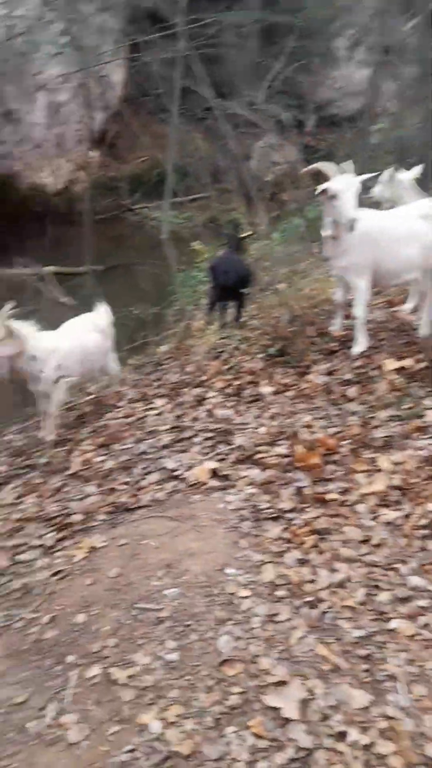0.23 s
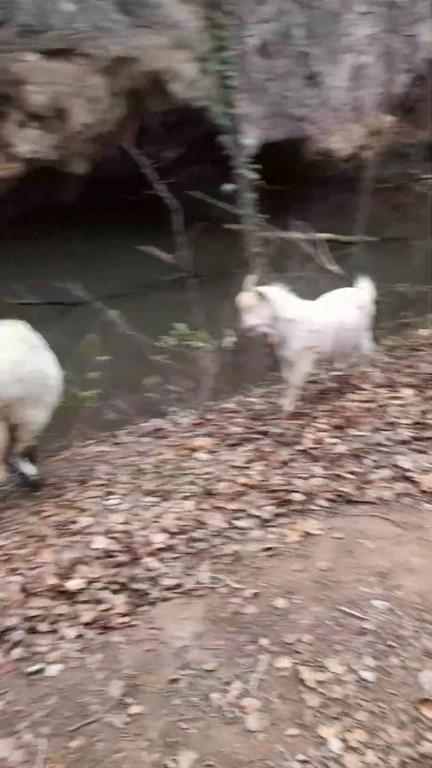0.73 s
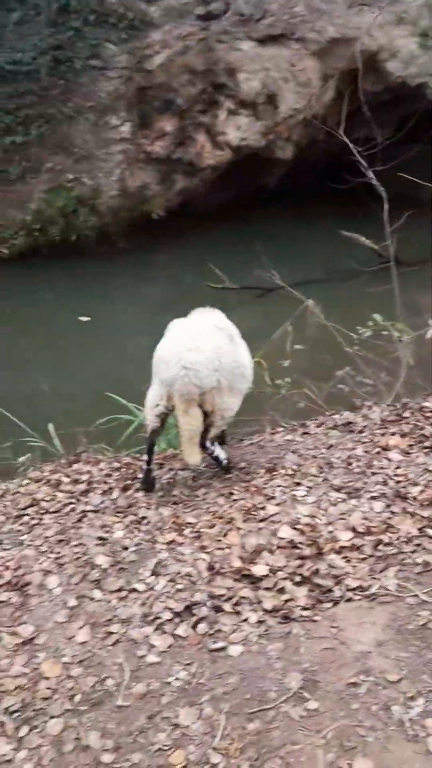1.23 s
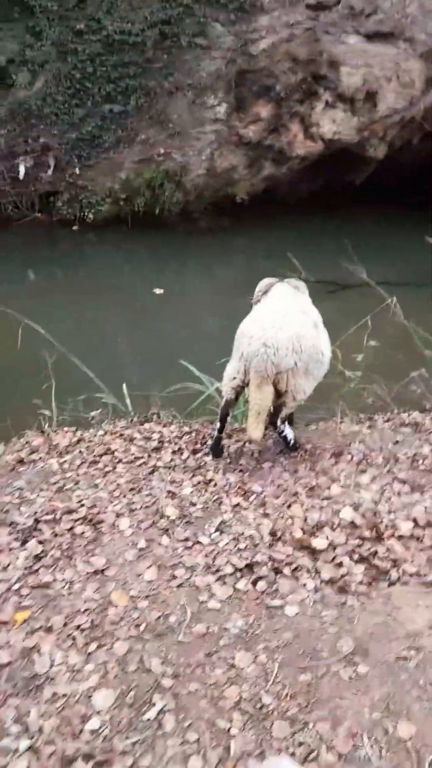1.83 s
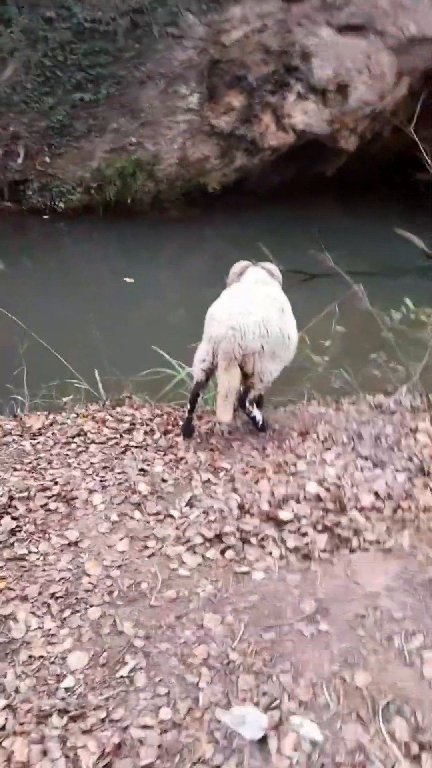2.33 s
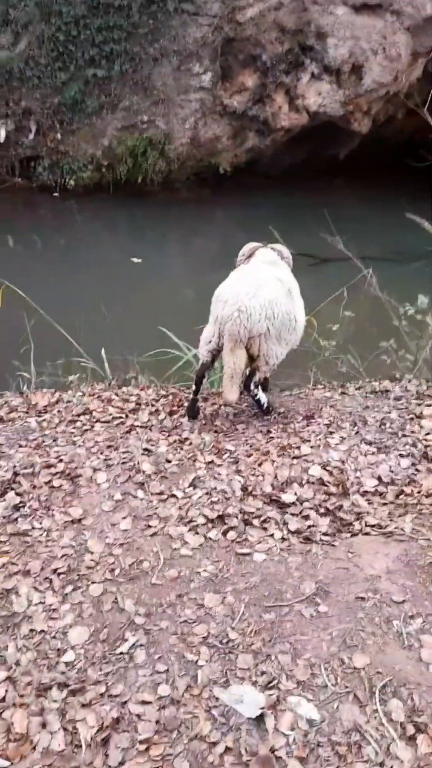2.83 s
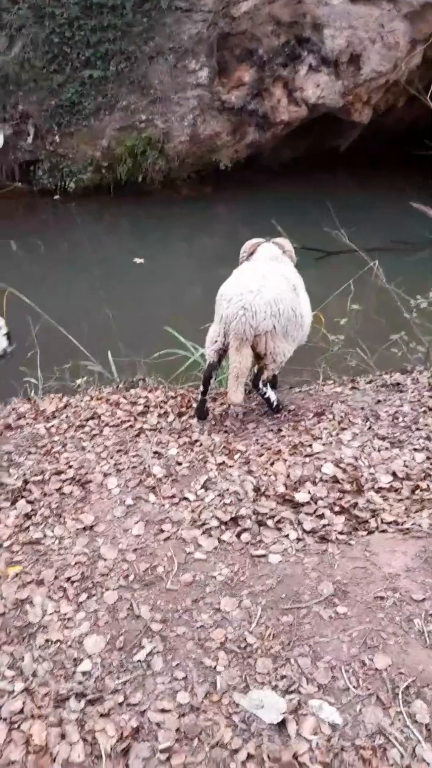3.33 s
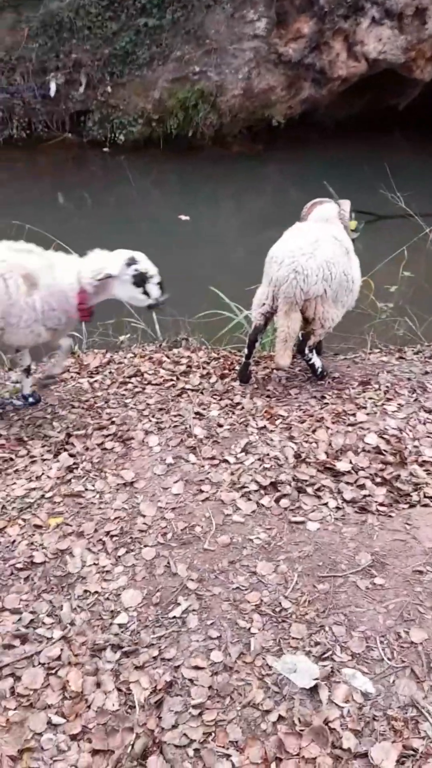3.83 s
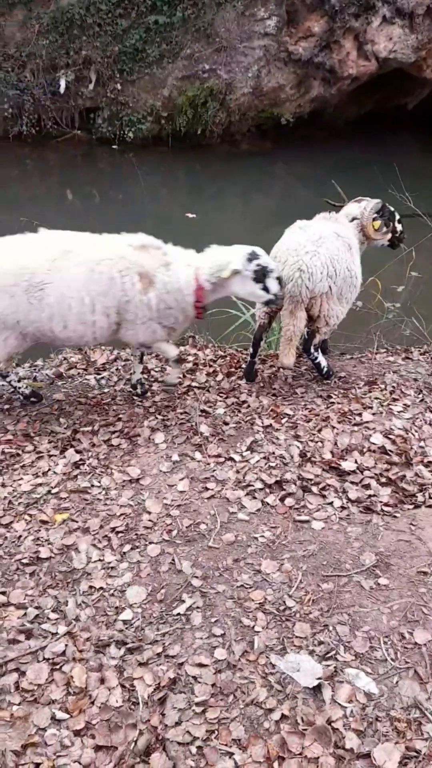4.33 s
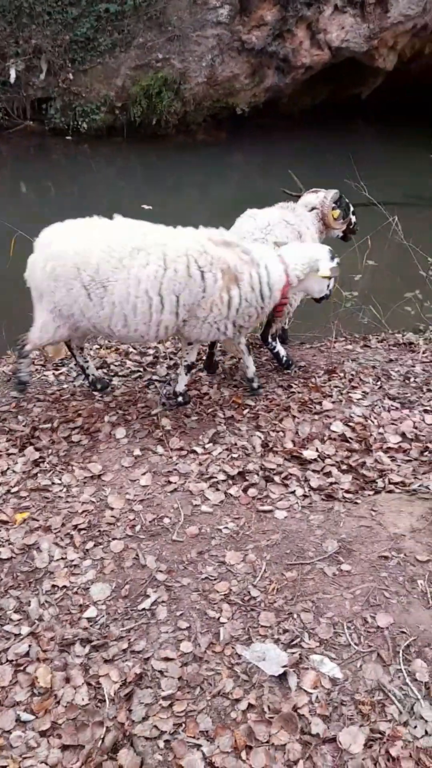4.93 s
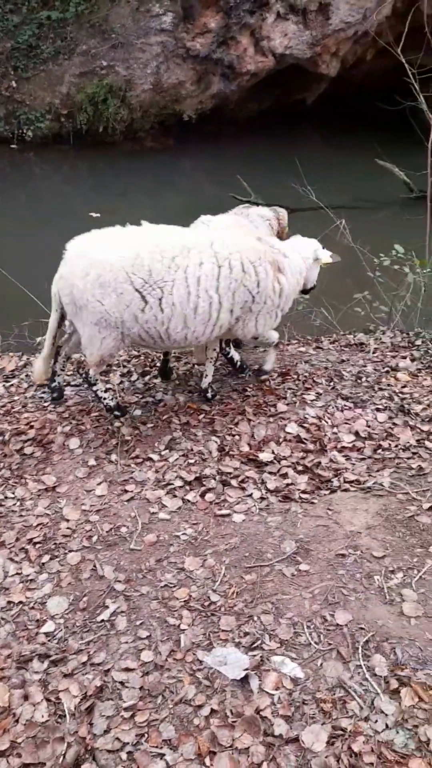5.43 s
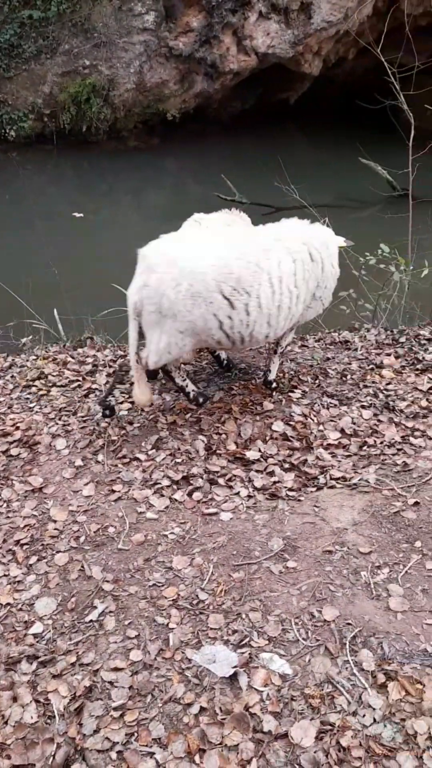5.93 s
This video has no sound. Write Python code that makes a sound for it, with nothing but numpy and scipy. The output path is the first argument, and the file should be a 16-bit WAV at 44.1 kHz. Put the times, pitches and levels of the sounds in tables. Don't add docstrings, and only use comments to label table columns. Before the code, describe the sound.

From 0 to about 0.5 s a shoe drags strongly through dry leaves, close and weighted to the right, a dense bright crackle swelling to a peak near 0.4 s. A slower drag builds from 0.55 to 1.45 s, with sharp leaf snaps; at about 1.2 to 1.45 s the rubber sole chirps and squeaks once, high and trembling. A short uneven scuff with stalk and twig cracks follows from 1.5 s, fading by 1.95 s. Then the level drops. Goat and sheep hooves step nearer the front, small rustling crunches over soft low soil pushes, clustered around 2.4 to 3.3 s and 3.7 to 4.1 s. From 4.2 to 5.2 s it is sparse and quiet. Crisper crunches come at 5.26 and 5.55 to 5.65 s, then lighter steps until 6.2 s. Faint distant water, airy hiss and far herd shuffling lie underneath, outdoors, in close stereo.

```python
import sys
import numpy as np
from scipy import signal
from scipy.fft import rfft, irfft
from scipy.io import wavfile
from scipy.ndimage import uniform_filter1d

SR = 44100
rng = np.random.default_rng(int(sys.argv[2]) if len(sys.argv) > 2 else 0)


def amplitude_ratio(level_db):
    exponent = np.asarray(level_db, float) / 20
    return 10 ** exponent


def digitize_waveform(pressure):
    field = np.atleast_2d(pressure).T
    bounded = np.clip(field, -1, 1)
    quanta = np.round(bounded * 32767).astype(np.int16)
    wavfile.write(sys.argv[1], SR, quanta)


N = 273420

# frequency in Hz, left and right density in dB per Hz.
DRAG_COLOUR = [(80, -30, -24.5), (225, -17, -13), (480, -16, -12.5), (890, -13, -9.5), (3130, -14, -10.5),
               (4270, -11.5, -6.5), (4750, -13.5, -9.5), (6500, -17.5, -6.5), (7330, -19, -3.5),
               (8750, -17.5, -10), (10160, -13, -0.5), (11360, -13, -7), (15100, -13.5, -2.5),
               (15700, -40, -12.5)]
# frequency in Hz, left and right density in dB per Hz.
HOOF_COLOUR = [(80.6, -10, -5), (221, -4, 9), (490, -16, -16.5), (870, -9, -9), (1520, -13.5, -10.5),
               (2120, -10, -8), (2800, -8, -9), (4480, -6, -2.5), (6300, -6, -2), (8300, -7.5, -3.5),
               (10050, -0.5, 3.5), (12700, -1, -2.5), (14560, -1.5, 1.5), (16000, -10, -25)]
# frequency in Hz, left and right density in dB per Hz.
AIR_COLOUR = [(25, -125, -120), (47, -112, -107), (95, -110, -105), (251, -107, -103), (610, -110, -107),
              (720, -104, -103), (920, -100, -99), (1430, -105, -103), (2290, -108, -106),
              (3930, -104, -101), (8200, -107, -102), (10800, -102, -102), (13500, -101, -102),
              (15000, -112, -112)]
# frequency in Hz, then likeness from 0 to 1 for sole, hooves and air.
LIKENESS = [(60, 0.25, .4, 0.87), (293, 1, 1, 0.7), (1280, 0.69, 0.75, 0.44), (3200, 0.66, 0.57, 0.16),
            (4870, 0.73, 0.5, 0.07), (7000, 0, 0.53, 0), (10700, 0, 0.06, 0)]
# time in seconds, delay in samples.
LEFT_LAG = [(0, 22), (1.95, 22), (2.0, 6), (3.5, 5), (3.6, 1), (6.2, 0)]
# multiple, level in dB.
SQUEAKS = [
    ([(1.232, 1030, -60), (1.245, 1097, -53), (1.275, 1120, -47.5), (1.292, 1250, -43)], [(1, 0), (2, 3.5)]),
    ([(1.28, 1521, -55), (1.292, 1678, -35.5), (1.322, 1692, -38), (1.342, 1727, -41.5), (1.37, 1667, -36.5), (1.385, 1550, -39), (1.392, 1530, -62)], [(1, -1), (3, -20), (4, -3.5), (5, -18)]),
    ([(1.285, 1696, -46), (1.293, 1677, -39), (1.315, 1679, -37), (1.328, 1696, -35)], [(4, 7.5), (6, -4), (7, -2), (8, -5)]),
    ([(1.378, 1258, -61), (1.387, 1246, -42.5), (1.398, 1133, -53), (1.412, 1190, -47), (1.42, 1190, -68)], [(1, 0), (2, -3), (5, -2), (6, -9)]),
    ([(1.41, 1610, -53.5), (1.422, 1770, -49), (1.437, 1800, -52), (1.447, 1820, -70.5)], [(1, 3), (3, 5), (7, 5)]),
    ([(1.217, 9350, -50), (1.223, 9150, -38), (1.235, 8300, -42), (1.242, 8200, -53)], [(1, 3)]),
]
# time in seconds, frequency in Hz, level in dB.
WHINE = [
    (1.288, 9510, -55),
    (1.3, 9560, -39),
    (1.315, 9570, -37.5),
    (1.338, 9350, -31.5),
    (1.36, 9600, -44),
    (1.38, 9800, -55),
]
# offset in steps of BEAT_HZ, level in dB.
SIDE_LINES = [(-3, -9), (-2, -14), (0, 0), (1, -3), (2, -5)]
BEAT_HZ = 1700
SQUEAK_LEFT_DB, SQUEAK_JITTER = -8.5, 0.0011
TOP_HZ = 15800
SNAP_BANDS = [(400, 2500), (2500, 8000), (8000, 15000)]
# time in seconds, level on the hiss in dB.
FAR_HERD = [
    (0, 5.5),
    (2.3, 3),
    (2.9, 1.7),
    (3.6, -1),
    (4.3, -1.4),
    (4.85, -2.6),
    (5.15, 0.5),
    (5.9, -1.4),
    (6.2, -2),
]
# time in seconds, rubbing level in dB, weight on the soil in dB.
STROKES = [
    [(0.0, -44.5, -67), (0.1, -38, -55), (0.15, -36.5, -54.5), (0.26, -34, -60), (0.37, -35, -60),
     (0.41, -30, -51.5), (0.44, -45.5, -61), (0.48, -41.5, -60.5)],
    [(0.52, -58, -70.5), (0.61, -46, -70), (0.67, -51.5, -69), (1.03, -38, -58.5), (1.08, -37.5, -53),
     (1.31, -37, -59.5), (1.44, -41.5, -60.5)],
    [(1.54, -45, -55), (1.69, -43.5, -58), (1.705, -39.5, -56), (1.75, -45.5, -61.5), (1.79, -40.5, -55.5),
     (1.86, -55, -58.5), (1.93, -66, -73), (2.0, -59, -85)],
]
SOLE_BODY_DB, BODY_FOLLOWS_WEIGHT = 1, 0.57
# peak in seconds, crackle in dB, body relative to it in dB, dying in s per 20 dB.
STAMPS = [(2.359, -52, -14, .16), (2.969, -49, -10.5, 0.1), (3.741, -48, -18, 0.08),
          (3.944, -46, -12, .085), (4.1, -54, -9, 0.08), (4.972, -54.5, -12.5, .125),
          (5.262, -39.5, -12, .05), (5.384, -53.5, -17, 0.13), (5.547, -44, -8, 0.07),
          (5.573, -39.5, -9, 0.0272), (5.753, -43, -15, 0.06), (6.11, -47.5, -11, 0.1),
          (6.197, -49.5, -23, .11)]
# peak in seconds, crackle in dB, body relative to it in dB,
# swell and dying in s per 20 dB (not above zero: silent).
PRESSES = [(1.971, -58.5, -15, 0.3), (2.462, -42, -11, 0.11), (2.595, -47.5, -16, -0.06),
           (2.704, -53.5, -5, 0.17), (2.707, -42.5, -14, .056), (3.008, -43.5, -14, -0.01),
           (3.246, -41.5, -10.5, .066), (3.289, -42, -12.5, 0.0478), (3.795, -46, -16, -0.02),
           (4.036, -51.5, -16, 0.06), (4.485, -52, -8.5, 0.03), (4.922, -61, -22, 0.1), (5.36, -52, -16, 0),
           (5.825, -48, -15.5, 0.04), (6.035, -53, -15, 0.1), (6.088, -55.5, -15.5, 0.14)]
STAMP_SWELL_S, SCUFF_DYING_S = 0.021, 0.057
LEAN_SWELL_S, LEAN_DYING_S, SOIL_REST_DB = 0.25, 0.29, -82
# time in seconds, peak in dB, thickness (0 leaf, 1 stalk, 2 twig).
SOLE_SNAPS = [(0.2383, -12, .07), (.498, -25.5, 0.34), (.5405, -36, .6), (.576, -18.5, .01),
              (.78, -22, 0.35), (0.8765, -12.5, .04), (1.2666, -13.5, 0.39), (1.29, -12, .01),
              (1.3135, -19.5, .15), (1.3205, -17, .1), (1.368, -22, .15), (1.4886, -25, .07),
              (1.4918, -14, 0.33), (1.5417, -15.5, 0.17), (1.552, -18, .4), (1.585, -25, .8),
              (1.6364, -23, .07), (1.6682, -18, 1.16), (1.676, -17.5, 0.49), (1.7031, -26, 1.46),
              (1.708, -27.5, 1.63), (1.7354, -17, 0.39), (1.7387, -14, .35), (1.7856, -26, 1.6),
              (1.796, -28.5, 2.2), (1.8149, -23, 0.36), (1.859, -29.5, 1.36), (1.875, -21, .4),
              (1.8944, -29, .07), (1.9304, -29.5, .1)]
# time in seconds, peak in dB, thickness as above.
GOAT_SNAPS = [(2.0421, -27, 0.41), (2.056, -31, .27), (2.1063, -28, .2), (2.114, -28, 0.18),
              (2.1922, -33.5, 0.51), (2.239, -34.5, 0.53), (2.4311, -23.5, .12), (2.467, -24, 0.27),
              (2.5725, -26, 0.44), (2.5898, -31.5, 0.98), (2.6292, -33, 0.46), (2.633, -30, .42),
              (2.6512, -29, .07), (2.7834, -29.5, .1), (2.9414, -28, .01), (2.9905, -25.5, 0.89),
              (3.0085, -34, .2), (3.0732, -38, 0.6), (3.115, -31.5, .1), (3.3825, -31.5, .15),
              (3.427, -32, .02), (3.525, -29, .02), (3.79, -21.5, 0.27), (3.794, -22.5, 0.36),
              (3.8107, -25, 0.32), (3.8803, -19, .01), (3.9394, -33, .25), (3.9478, -27, .01),
              (4.1024, -29.5, .1), (4.2104, -32.5, .5)]
# time in seconds, peak in dB, thickness as above.
SHEEP_SNAPS = [(4.3914, -27, .01), (4.4271, -28, .01), (4.432, -33.5, .01), (4.4806, -32, .15),
               (4.653, -26.5, 0.14), (4.72, -32.5, .01), (4.9204, -40, 0.23), (5.055, -36, 0.22),
               (5.1503, -37, .2), (5.1896, -43, 0.97), (5.263, -24.5, 1), (5.3621, -32, .01),
               (5.5011, -34.5, 0.42), (5.558, -24, .52), (5.572, -34, .55), (5.5765, -23, .6),
               (5.594, -34, .75), (5.6251, -19.5, 0.091), (5.6287, -30, .2), (5.633, -23.5, .05),
               (5.636, -29, .1), (5.646, -42, .7), (5.675, -33.5, .52), (5.763, -29, 0.72),
               (5.859, -38, 0.69), (6.073, -39, 0.38), (6.0844, -31, 0.39), (6.1033, -26.5, .01),
               (6.1194, -21.5, 0.38), (6.1927, -30, .01)]
SNAP_SLOPE_DB = 22
# time in seconds, level in dB.
LEANS = [
    (2.0, -70),
    (2.47, -66),
    (2.66, -67.5),
    (3.3, -63.5),
    (3.4, -67.5),
    (3.93, -71),
    (5.25, -71),
    (5.45, -72),
    (5.8, -73.5),
    (6.17, -71),
]
# peak in seconds, crackle in dB, body relative to it in dB,
# dying in s per 20 dB (negative: silent).
BREAKS = [
    (2.631, -48, -9, -0.1),
    (2.937, -47.5, -14, 0.08),
    (5.226, -48.5, -14.5, 0.17),
    (5.628, -48.5, -12, 0.1),
]
BREAK_SWELL_S, PEAK_ROUNDING = 0.004, 0.12
# peak in seconds, crackle in dB, body relative to it in dB,
# swell in s per 20 dB (negative: silent).
SHUFFLES = [
    (2.112, -50.5, -10.5, 0.17),
    (2.249, -58.5, -11, 0.7),
    (3.49, -53, -9.5, 1.0),
    (3.522, -53, -7, -0.3),
    (3.878, -44, -13, .17),
    (4.218, -60, -6, 0.05),
    (4.43, -49, -17, 0.06),
    (4.721, -57, -10, 0.23),
    (5.17, -65, -25, 0.2),
]


def in_time(rows, outside=None):
    s, *columns = np.transpose(rows)
    return [np.interp(np.arange(N) / SR, s, c, outside, outside) for c in columns]


def at_hz(points, hz, axis=1):
    points = np.array(points)
    return np.interp(np.log(hz), np.log(points[:, 0]), points[:, axis])


def rms_one(x):
    return x / np.sqrt(np.mean(x ** 2) + 1e-20)


def drift(rate):
    r = np.exp(-16 * np.pi * rate / SR)
    slow = signal.lfilter([1], [1, -2 * r, r * r], rng.standard_normal(N // 8 + 4002))
    slow = slow[4000:]
    return np.interp(np.arange(N) / 8, np.arange(len(slow)), rms_one(slow - slow.mean()))


def band(x, low, high):
    return signal.sosfilt(signal.butter(2, [low, high], "band", fs=SR, output="sos"), x + 1e-18)


def delay_left(x):
    lag = np.round(in_time(LEFT_LAG)[0]).astype(int)
    late = np.clip(np.arange(N) - lag, 0, N - 1)
    return np.array([x[0][late], x[1]])


def coloured(sizes, colour, axis, low=20, high=20000):
    hz = np.maximum(np.fft.rfftfreq(sizes.shape[1], 1 / SR), 1)
    alike = np.clip(at_hz(LIKENESS, hz, axis), 0, 1)
    cut = (hz < TOP_HZ) / np.sqrt((1 + (low / hz) ** 6) * (1 + (hz / high) ** 6))
    left = amplitude_ratio(at_hz(colour, hz, axis=1)) * cut
    right = amplitude_ratio(at_hz(colour, hz, axis=2)) * cut
    same, other = rfft(sizes)
    left_mix = alike * same + np.sqrt(1 - alike ** 2) * other
    both = irfft([left * left_mix, right * same], sizes.shape[1])
    strength = np.sqrt(np.mean(left ** 2 + right ** 2) / 4)
    return both, strength


def air():
    white = rng.standard_normal((2, 2, N)) * np.sqrt(SR / 2)
    burble, _ = coloured(white[0] * amplitude_ratio(2.05 * drift(7.4)), AIR_COLOUR, axis=3, high=2900)
    hiss_db = in_time(FAR_HERD)[0] + 1.3 * drift(14)
    hiss, _ = coloured(white[1] * amplitude_ratio(hiss_db), AIR_COLOUR, axis=3, low=1040)
    return burble + hiss


def litter(levels_db, colour, axis, per_s, spread_db, clump_db, bed_db, patchy_db):
    cracked = rng.random(N) < per_s / SR
    size = amplitude_ratio(spread_db * np.minimum(rng.exponential(1, N), 3.2)) * cracked
    clumps = amplitude_ratio(clump_db * (0.18 * drift(8.2) + drift(97)))
    push = rms_one((rms_one(size) + amplitude_ratio(bed_db)) * clumps)
    crackle_db, body_db = levels_db
    dull_db = 0.14 * np.clip(body_db - crackle_db + 12, -12, 12)
    parts = [(body_db, 700, 3000),
             (crackle_db - 5.0 + dull_db, 3000, 8000),
             (crackle_db - 2.0 - 0.49 * dull_db, 8000, 20000)]
    out = 0
    for db, low, high in parts:
        grains = amplitude_ratio(db + patchy_db * drift(41)) * push * rng.standard_normal((2, N))
        part, strength = coloured(grains, colour, axis, low, high)
        out = out + part / strength
    return amplitude_ratio(-0.18) * delay_left(out)


def sole_drag(rub_db, weight_db):
    body_db = rub_db + SOLE_BODY_DB + BODY_FOLLOWS_WEIGHT * (weight_db - rub_db)
    return litter((rub_db, body_db), DRAG_COLOUR, axis=1, per_s=4000, spread_db=2.5,
                  clump_db=1.19, bed_db=3.0, patchy_db=0.8)


def soil(sole_db):
    t = np.arange(N) / SR
    leans = 0
    for s, db in LEANS:
        away = np.maximum((s - t) / LEAN_SWELL_S, (t - s) / LEAN_DYING_S)
        leans = leans + amplitude_ratio(db - 20 * away) ** 2
    weight = np.sqrt(amplitude_ratio(sole_db) ** 2 + leans + amplitude_ratio(SOIL_REST_DB) ** 2)
    push = weight * amplitude_ratio(2.76 * drift(29))
    part, strength = coloured(push * rng.standard_normal((2, N)), DRAG_COLOUR, axis=1, low=51, high=820)
    return amplitude_ratio(-1.0) * delay_left(part / strength)


def snaps():
    rows, out = np.array(SOLE_SNAPS + GOAT_SNAPS + SHEEP_SNAPS), np.zeros((2, N + 400))
    same, other = rng.standard_normal((len(rows), 2, 400)).transpose(1, 0, 2)
    left = amplitude_ratio(np.where(rows[:, :1] < STROKES[-1][-1][0], -8, -2.5))
    draws = np.array([left * (0.5 * same + 0.41 * other), same])
    away = np.abs(rows[:, 2] - np.array([[2], [1], [0]]))
    peaks_db = rows[:, 1] - SNAP_SLOPE_DB * (away - away.min(axis=0))
    for (low, high), t60, peak_db in zip(SNAP_BANDS, (.009, .0035, .003), peaks_db):
        bursts = band(draws * amplitude_ratio(-60 * np.arange(400) / SR / t60), low, high)
        bursts *= (amplitude_ratio(peak_db + 3.0) / np.hypot(*bursts).max(axis=1))[:, None]
        for i, s in enumerate(rows[:, 0]):
            start = int(s * SR)
            out[:, start:start + 400] += bursts[:, i]
    top_cut = signal.cheby2(8, 40, 16600, fs=SR, output="sos")
    return delay_left(signal.sosfilt(top_cut, out[:, :N] + 1e-18))


def squeak():
    now = slice(int(1.2 * SR), int(1.5 * SR))
    out, tremble = 0, 1 + SQUEAK_JITTER * drift(150)[now]
    for path, partials in SQUEAKS:
        hz, db = np.array(in_time(path, -200))[:, now]
        phase = 2 * np.pi * np.cumsum(hz * tremble) / SR
        for k, part_db in partials:
            level = amplitude_ratio(db + part_db + 4.5 + 1.3 * drift(70)[now])
            out = out + level * np.sin(round(k) * phase)
    hz, db = np.array(in_time(WHINE, -200))[:, now]
    for k, part_db in SIDE_LINES:
        phase = 2 * np.pi * np.cumsum((hz + k * BEAT_HZ) * tremble) / SR
        out = out + amplitude_ratio(db + part_db + 2) * np.sin(phase)
    out = np.pad(out, (now.start, N - now.stop))
    ports = np.array([[amplitude_ratio(SQUEAK_LEFT_DB)], [1]])
    return delay_left(out * amplitude_ratio(1.3 * drift(56)) * ports)


def hoof_levels():
    crackle, body, t = np.full(N, 1e-12), np.full(N, 1e-12), np.arange(N) / SR
    steps = [(*row[:3], STAMP_SWELL_S, row[3]) for row in STAMPS]
    steps += [(*row, row[3]) for row in PRESSES]
    steps += [(*row, SCUFF_DYING_S) for row in SHUFFLES]
    steps += [(*row[:3], BREAK_SWELL_S, row[3]) for row in BREAKS]
    for s, db, body_db, swell, dying in steps:
        near = slice(max(int((s - 3 * swell) * SR), 0), int((s + 3 * dying) * SR))
        away = np.maximum((s - t[near]) / swell, (t[near] - s) / dying)
        power = amplitude_ratio(db + 0.7 - 20 * np.hypot(away, PEAK_ROUNDING) + 20 * PEAK_ROUNDING / 2) ** 2
        crackle[near] += power
        body[near] += power * amplitude_ratio(body_db) ** 2
    crackle, body = uniform_filter1d([crackle, body], size=60)
    return 10 * np.log10(np.maximum([crackle, body], 1e-12))


def hooves():
    return litter(hoof_levels(), HOOF_COLOUR, axis=2, per_s=2500, spread_db=3.0,
                  clump_db=1.82, bed_db=1.3, patchy_db=1.5)


def scene():
    rub_db, weight_db = in_time(np.concatenate(STROKES), -200)
    walker = sole_drag(rub_db, weight_db) + squeak()
    return air() + walker + soil(weight_db) + snaps() + hooves()


def band_limit(x):
    return signal.sosfilt(signal.butter(12, 17030, fs=SR, output="sos"), x)


def record(dry):
    return band_limit(dry)


dry = scene()
out = record(dry)
digitize_waveform(out)
```